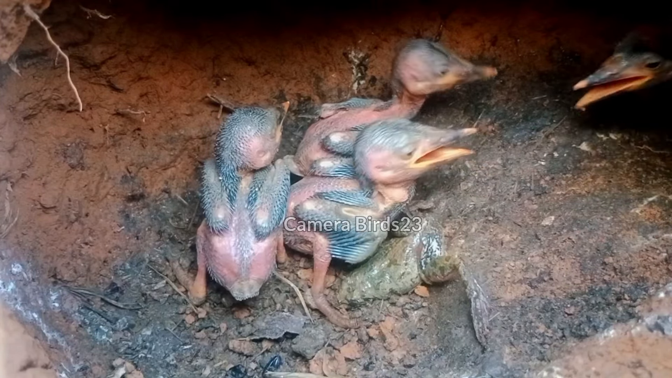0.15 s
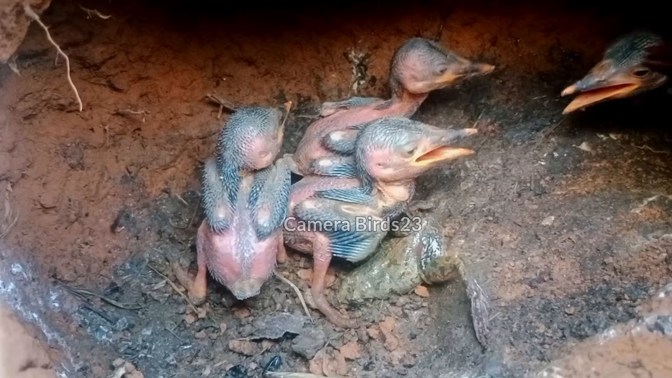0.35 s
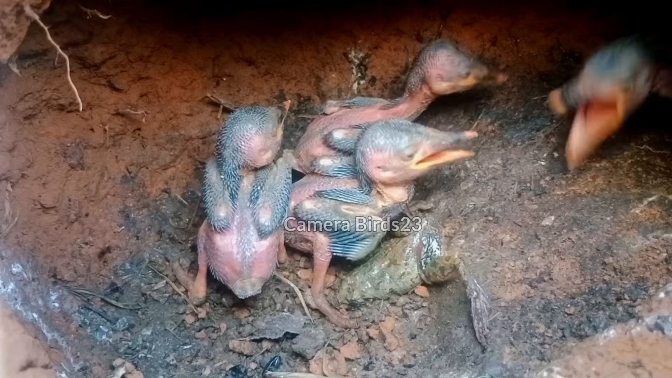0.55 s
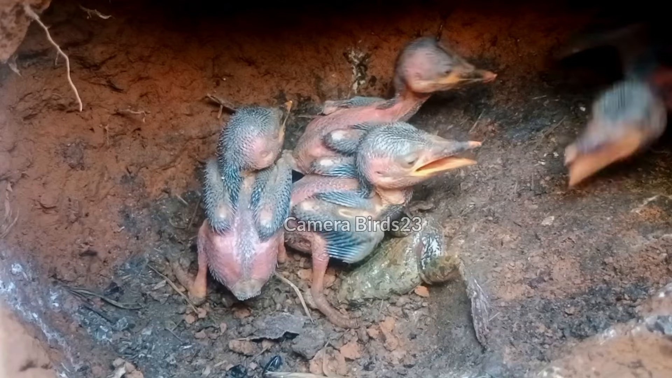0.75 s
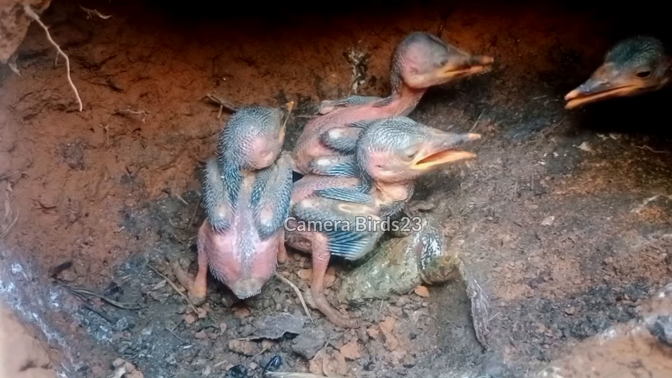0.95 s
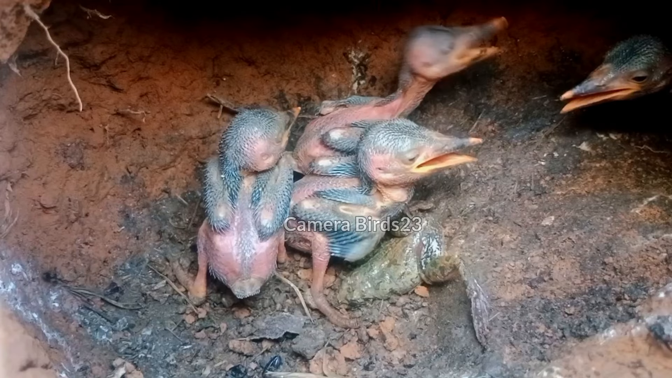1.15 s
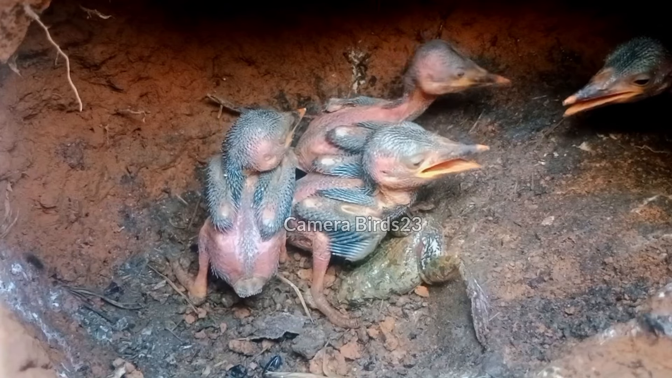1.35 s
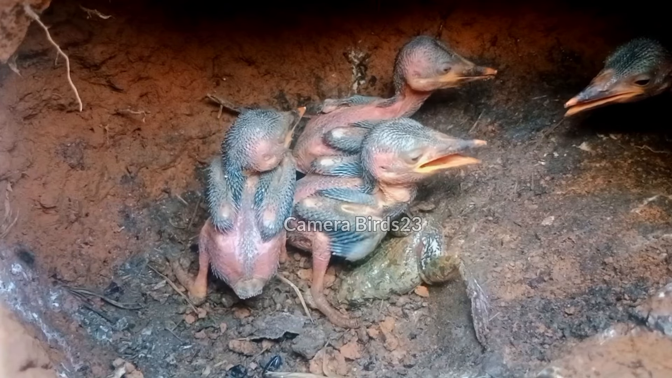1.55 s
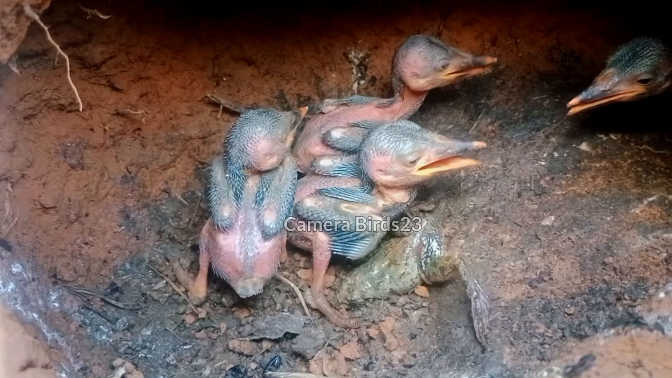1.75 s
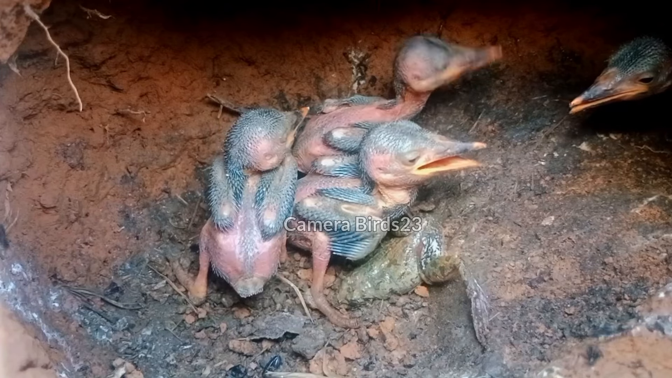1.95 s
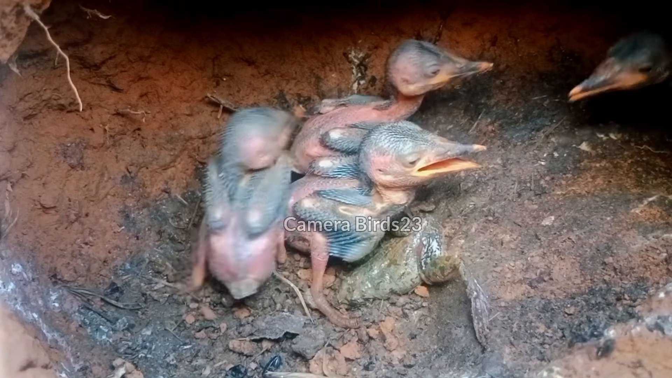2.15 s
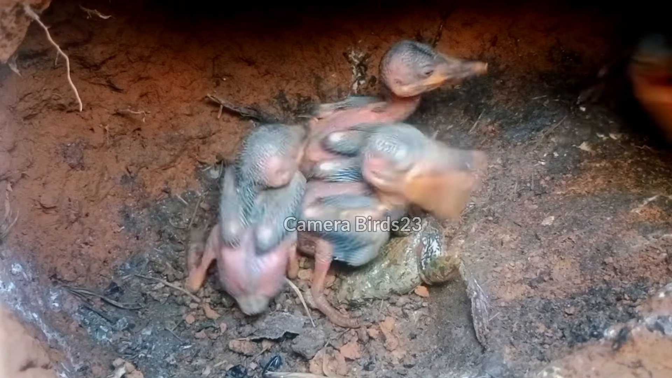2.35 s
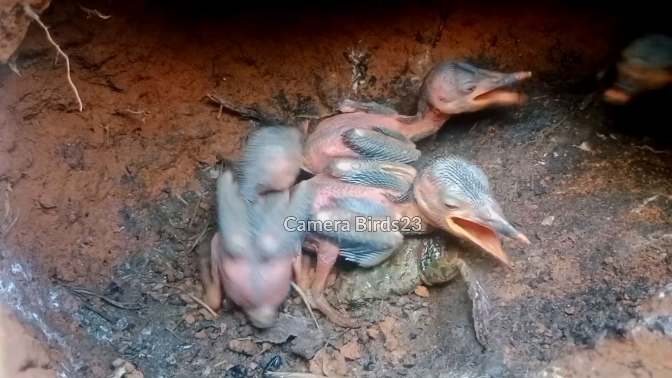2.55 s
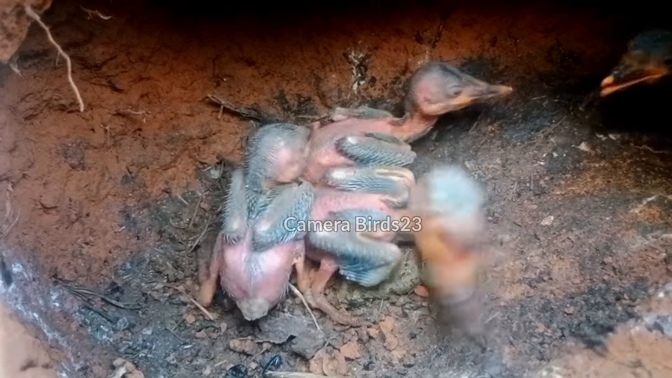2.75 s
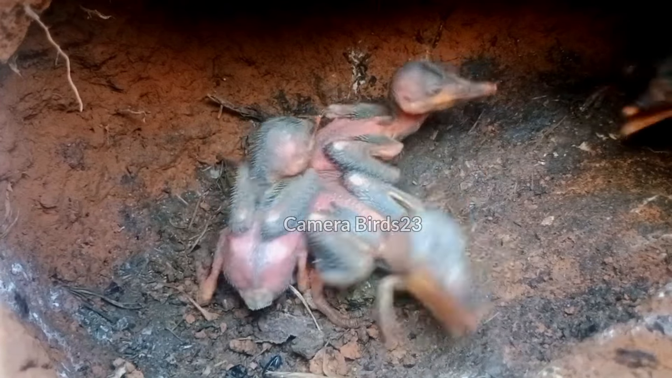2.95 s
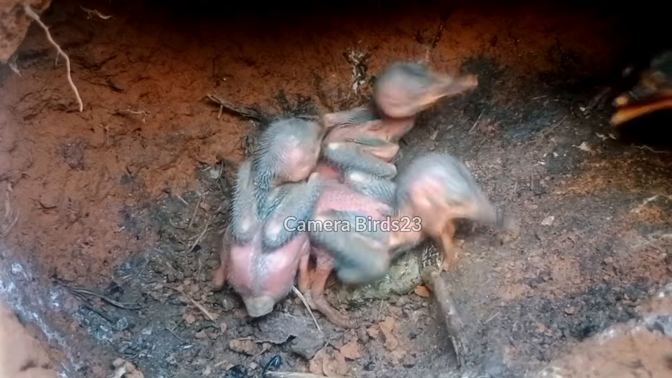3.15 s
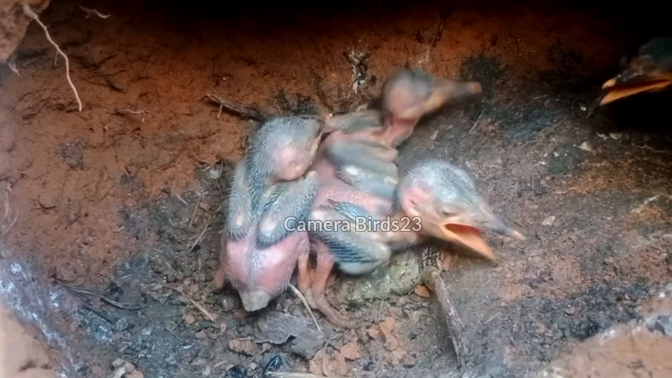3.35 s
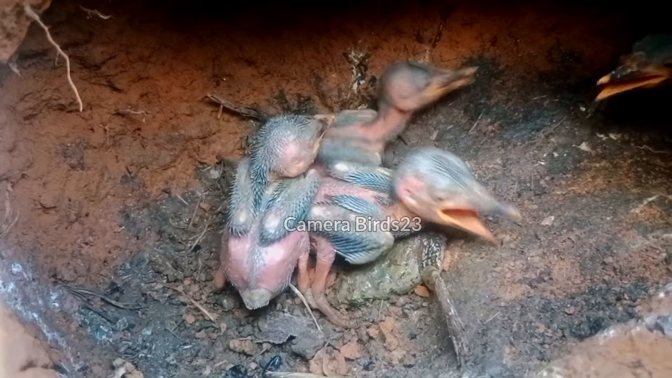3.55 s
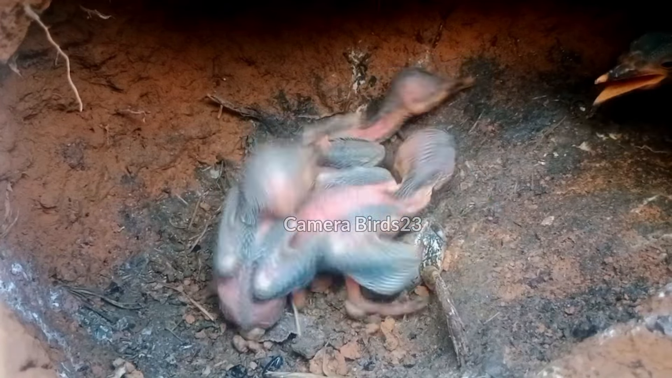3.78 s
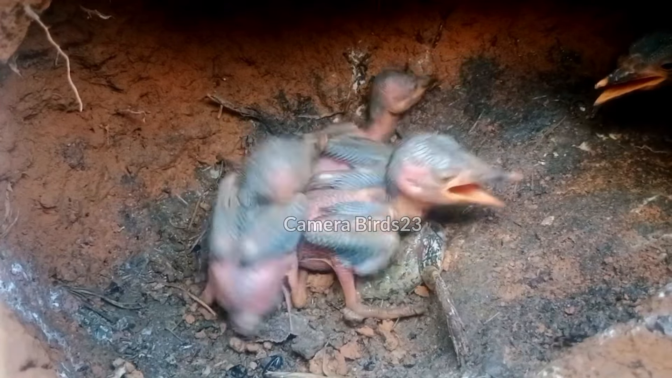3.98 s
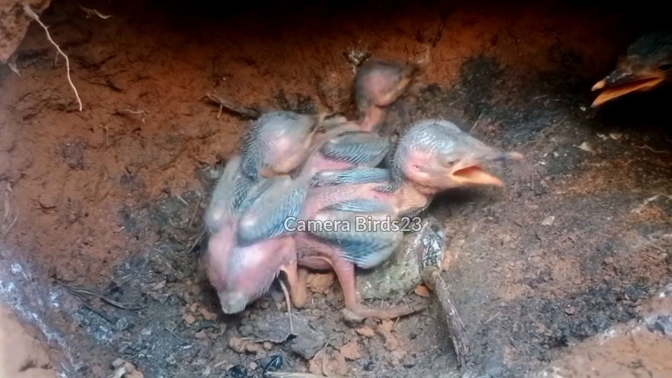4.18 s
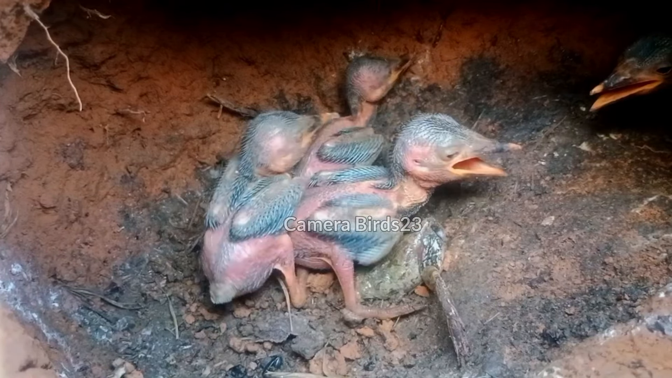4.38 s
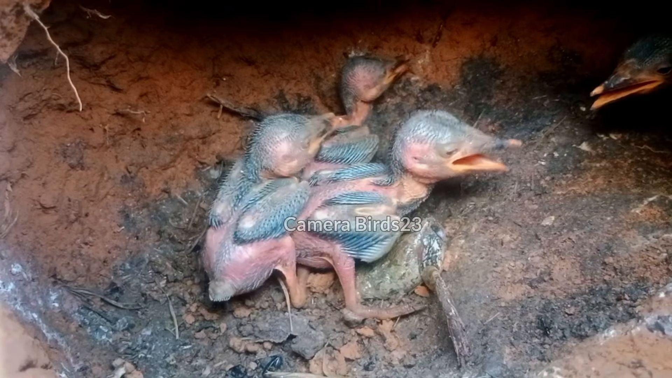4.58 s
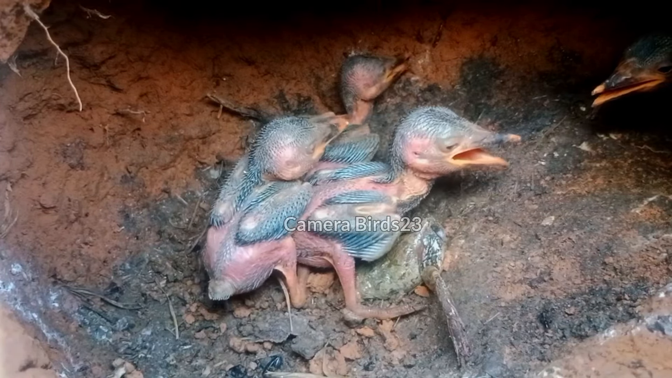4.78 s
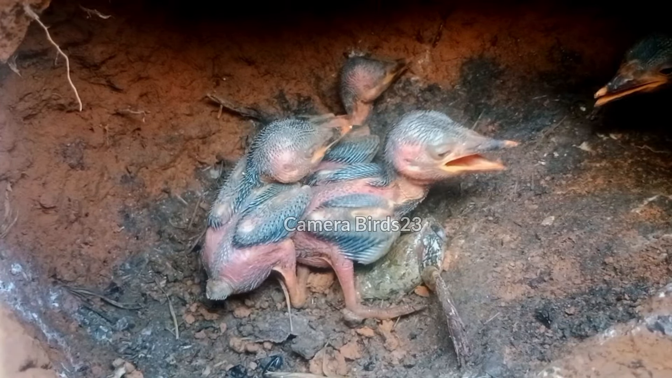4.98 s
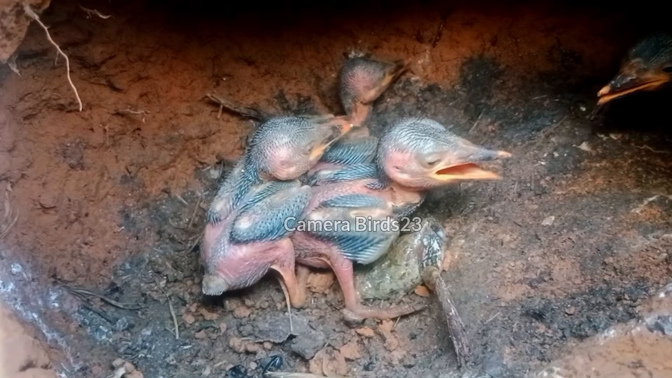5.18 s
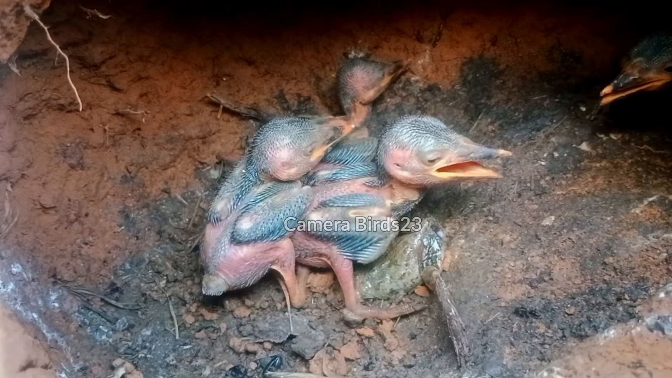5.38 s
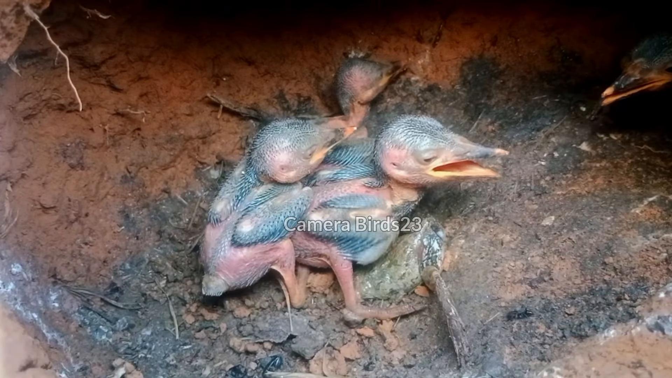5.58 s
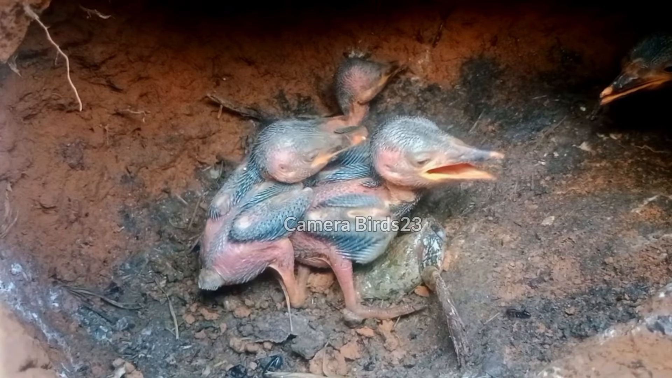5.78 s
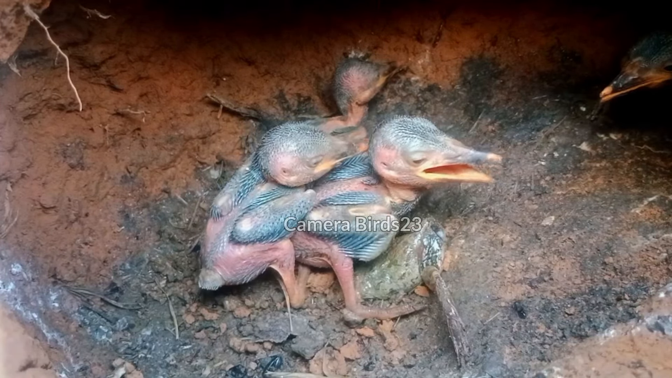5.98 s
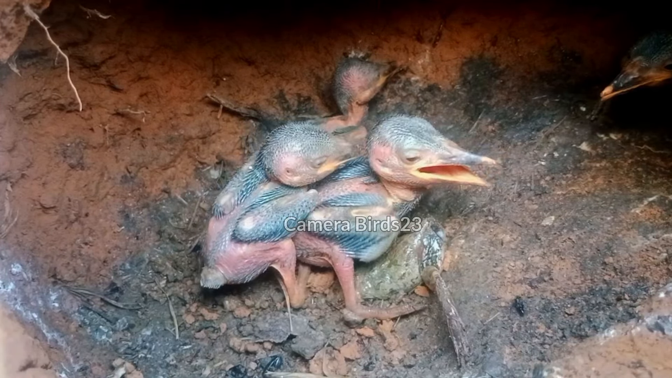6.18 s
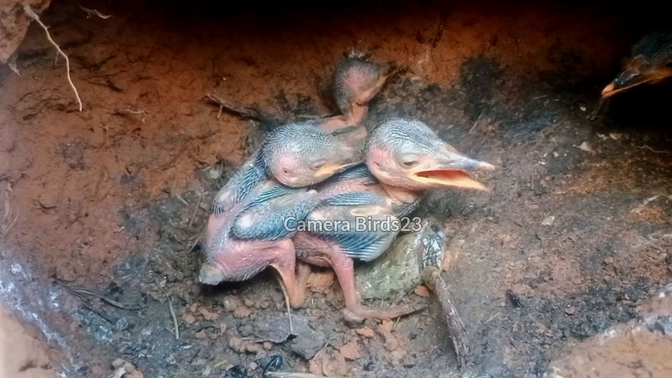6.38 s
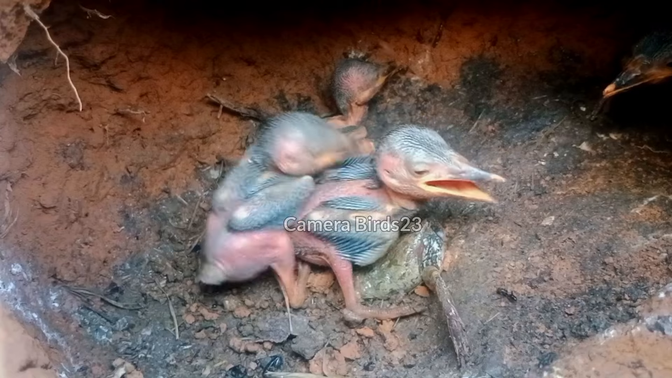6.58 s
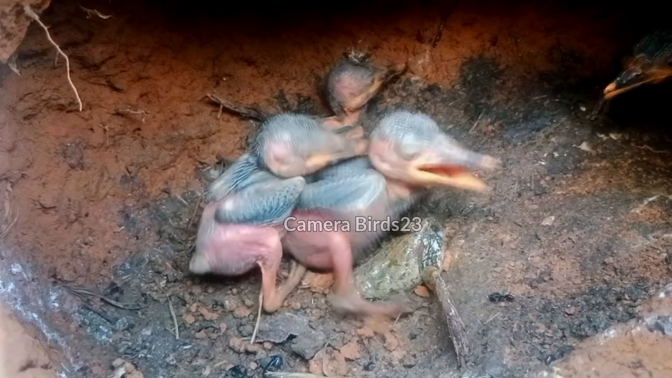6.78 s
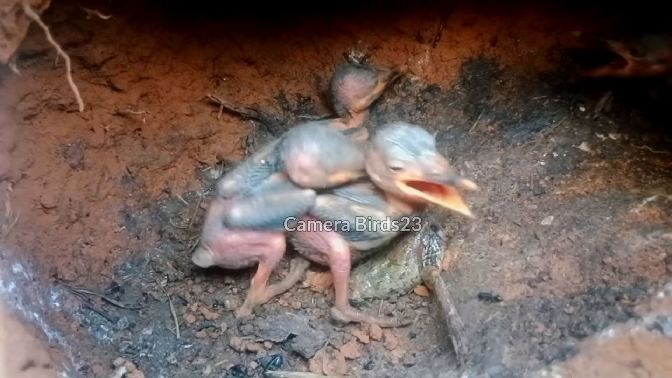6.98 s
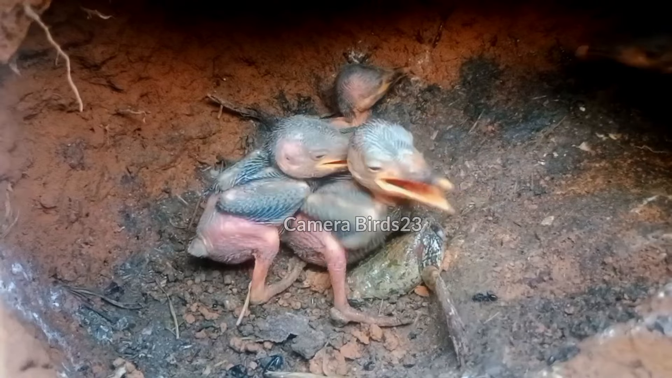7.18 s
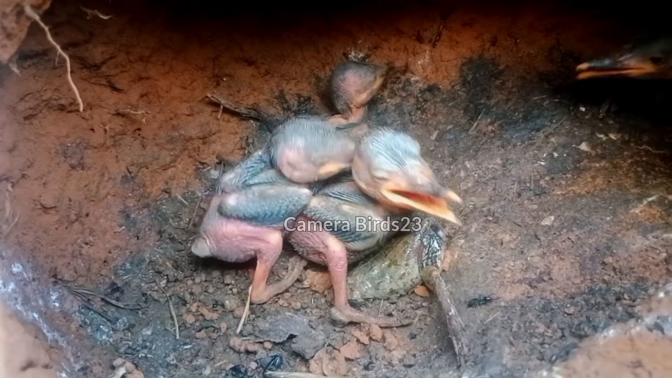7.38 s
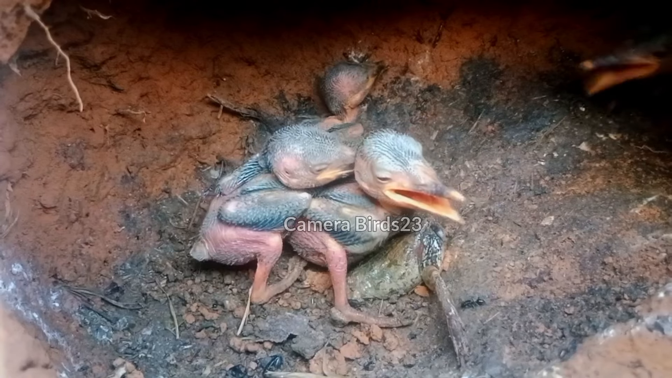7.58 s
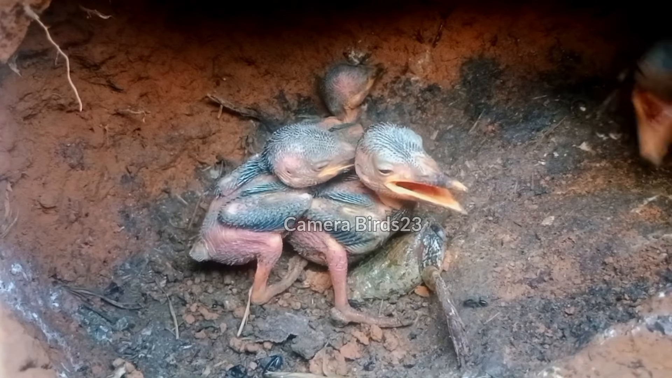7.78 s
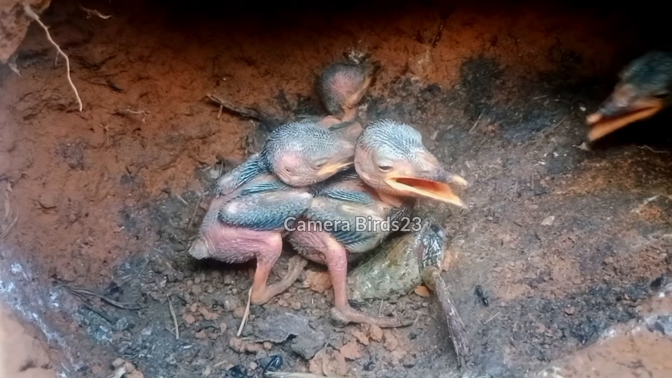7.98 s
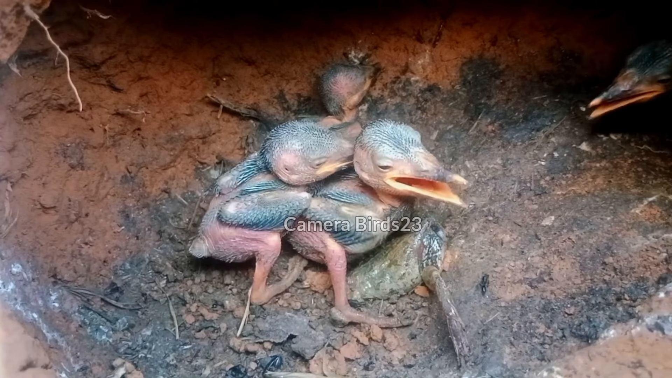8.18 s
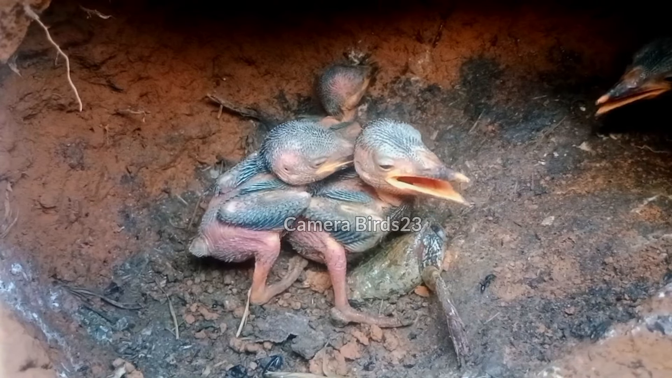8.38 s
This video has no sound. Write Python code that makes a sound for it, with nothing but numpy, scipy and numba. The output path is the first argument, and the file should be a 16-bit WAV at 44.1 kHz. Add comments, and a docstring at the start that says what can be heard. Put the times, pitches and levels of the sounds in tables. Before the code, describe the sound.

Nestlings in an earth burrow beg in fast, hoarse, rasping chirps about eight a second, swelling into one long squawk, with soft body thuds.

```python
"""Nestlings beg in an earth burrow, close to a small microphone: short hoarse calls, about eight a second,
and one long squawk. Each call is throbbing breath noise, partly whistling in the throat, partly rasping
in the air of the burrow, with breathy treble and small ticks; a thin hiss rides on top.
Bodies bump the soil now and then: low swings with a scuff of noise.
A noise gate turns down the quiet between the calls, and a faint steady self-noise lies under everything."""
import sys
import numpy as np
from scipy import signal
from scipy.fft import rfft, irfft, next_fast_len
from scipy.io import wavfile
from scipy.ndimage import uniform_filter1d
from numba import njit

SR = 44100
rng = np.random.default_rng(int(sys.argv[2]) if len(sys.argv) > 2 else 0)


def unload_wav(signal):
    """Save mono or channel-first audio to the path in sys.argv[1] as 16-bit WAV at rate SR, clipped to [-1, 1]."""
    wavfile.write(
        sys.argv[1],
        SR,
        np.round(np.clip(np.atleast_2d(signal).T, -1, 1) * 32767).astype(np.int16),
    )


N = 371763  # length of the scene in samples


def gain_of(db):
    """Turns decibels into a gain."""
    return 10 ** (np.asarray(db) / 20)


def evened(x):
    """Scales a sound to an average strength (rms) of one."""
    return x / np.sqrt(np.mean(x ** 2) + 1e-20)


def colour(x, points):
    """Filters a sound so that each pitch region gets the gain drawn by (Hz, dB) points."""
    f, db = np.transpose(points)
    size = next_fast_len(len(x))
    hz = np.fft.rfftfreq(size, 1 / SR)
    gain = gain_of(np.interp(np.log(hz + 1), np.log(f + 1), db))
    return irfft(rfft(x, size) * gain, size)[:len(x)]


@njit
def smooth(x, r):
    """Smooths by mixing each value with the last result; r, the share kept, may change over time."""
    y = x.copy()
    for i in range(1, len(x)):
        y[i] = r[i] * y[i - 1] + (1 - r[i]) * x[i]
    return y


def resonate(x, hz, width):
    """A resonance that may move: shifts pitch hz down to zero, smooths, and shifts back up."""
    turn = np.exp(2j * np.pi * np.cumsum(hz * np.ones(len(x))) / SR)
    keep = np.exp(-np.pi * width * np.ones(len(x)) / SR)
    return 2 * (turn * smooth(x / turn, keep)).real


def resonate_twice(x, hz, width, second_width):
    """Two resonances in a row at one pitch, which fall off more steeply on both sides."""
    return resonate(resonate(x, hz, width), hz, second_width)


def wander(hz):
    """Random drift of rms one, with changes up to about hz times a second."""
    slow = signal.butter(2, np.clip(hz, 1, 5000), fs=SR, output="sos")
    return evened(signal.sosfilt(slow, rng.standard_normal(N)))


def add_squawk(whistle, rasp, treble, tick, hz, rough):
    """Writes one long squawk into the curves: a drawn-out breath whose levels and pitch keep changing."""
    # The squawk point by point. Each row: time in seconds, whistle level in dB before the soil filter,
    # throat pitch in Hz, rasp level in dB before its filters, treble level in dB.
    squawk = [(2.8, -28, 3207, -41, -50.5), (2.83, -21.5, 3199, -36.5, -43), (2.87, -15.5, 3060, -35, -45),
              (2.901, -12.5, 3312, -37, -49.5), (2.94, -18.5, 3280, -31.5, -42),
              (2.98, -19, 3357, -39.5, -45), (3.03, -24.5, 3414, -32, -43.5),
              (3.08, -26.5, 3490, -33, -43.5), (3.117, -42.5, 3200, -38.5, -52)]
    s, whistle_db, throat_hz, rasp_db, treble_db = np.transpose(squawk)
    t = np.arange(s[0], s[-1], 1 / SR)
    a = round(s[0] * SR)
    span = slice(a, a + len(t))
    edges = signal.windows.tukey(len(t), .02)
    for curve, db in ((whistle, whistle_db), (rasp, rasp_db), (treble, treble_db)):
        curve[span] = edges * gain_of(np.interp(t, s, db))
    tick[a - 550:a - 250] += gain_of(-40.5) * np.hanning(300)  # a tick just before it
    hz[span], rough[span] = np.interp(t, s, throat_hz), .85


def call_curves():
    """Curves of all calls: the airway opens, holds and snaps shut, and the bill opens and closes."""
    # The short calls. Each row: start in seconds, length in seconds, whistle level in dB before the soil
    # filter, throat pitch in Hz before it bends, rasp level in dB before its filters, treble level in dB.
    calls = [(0.059, 0.074, -30, 2995, -44, -56), (0.184, 0.075, -32.5, 3017, -42.5, -55.5),
             (0.311, 0.084, -30, 2888, -42.5, -55.5), (0.446, 0.094, -33.5, 2830, -41, -56.5),
             (0.573, 0.065, -29, 2772, -43.5, -56.5), (0.738, 0.094, -32.5, 3000, -43, -56),
             (0.867, 0.071, -33, 2820, -43, -54.5), (0.994, 0.086, -31.5, 2923, -45, -56.5),
             (1.129, 0.085, -33, 2930, -41.5, -56.5), (1.263, 0.072, -34, 2950, -41.5, -57),
             (1.396, 0.06, -30.5, 3000, -39, -55), (1.521, 0.096, -32, 2998, -41, -56),
             (1.645, 0.074, -29.5, 2867, -44, -55.5), (1.779, 0.077, -31.5, 2877, -41, -56),
             (1.93, 0.097, -31.5, 2904, -39, -54), (2.033, 0.1, -27.5, 2880, -37, -53.5),
             (2.191, 0.069, -31, 2916, -44, -55), (2.329, 0.062, -25.5, 3440, -37, -44),
             (2.449, 0.083, -20.5, 3306, -35.5, -46.5), (2.544, 0.079, -13.5, 3213, -32, -45.5),
             (2.674, 0.065, -20, 3180, -35.5, -43.5), (3.17, 0.085, -31, 3433, -37.5, -50),
             (3.289, 0.065, -23.5, 3424, -38.5, -50.5), (3.402, 0.071, -23.5, 3260, -38.5, -53.5),
             (3.519, 0.074, -24.5, 3282, -36, -50), (3.644, 0.08, -26, 3403, -38.5, -48),
             (3.743, 0.12, -20.5, 3420, -34.5, -49), (3.845, 0.066, -23.5, 3350, -36.5, -48.5),
             (3.918, 0.015, -28, 2056, -58, -66), (3.939, 0.069, -22, 3403, -36.5, -47),
             (4.072, 0.076, -26.5, 3347, -36.5, -49.5), (4.189, 0.069, -26.5, 3190, -41.5, -52),
             (4.313, 0.064, -26.5, 3147, -41.5, -51.5), (4.431, 0.073, -28.5, 3063, -41, -53),
             (4.555, 0.076, -31.5, 3027, -41, -55), (4.672, 0.066, -33.5, 2980, -42.5, -57.5),
             (4.799, 0.071, -34.5, 3000, -44.5, -57), (4.926, 0.074, -31.5, 3100, -42, -56.5),
             (5.051, 0.067, -30.5, 3150, -42, -55), (5.174, 0.059, -31, 3166, -41.5, -54),
             (5.3, 0.075, -34, 3170, -43.5, -59), (5.43, 0.069, -32.5, 3078, -42.5, -55.5),
             (5.555, 0.078, -32.5, 3090, -43.5, -57), (5.679, 0.077, -31.5, 3134, -43, -55.5),
             (5.806, 0.084, -32.5, 3115, -40, -55.5), (5.938, 0.063, -33.5, 3180, -45.5, -56.5),
             (6.068, 0.082, -28, 3260, -40, -53), (6.19, 0.083, -32.5, 3194, -43, -55.5),
             (6.327, 0.076, -32.5, 3216, -41, -55.5), (6.454, 0.081, -29, 3200, -40, -53.5),
             (6.583, 0.072, -28.5, 3230, -40, -53), (6.71, 0.073, -23, 3440, -39, -49.5),
             (6.788, 0.085, -17.5, 3424, -37.5, -44.5), (6.922, 0.074, -20.5, 3430, -43.5, -50.5),
             (7.044, 0.073, -23.5, 3410, -43, -54.5), (7.167, 0.069, -22, 3406, -43, -55),
             (7.291, 0.081, -25.5, 3360, -40.5, -54), (7.422, 0.063, -29.5, 3285, -44.5, -58),
             (7.549, 0.079, -29, 3150, -38.5, -54.5), (7.679, 0.085, -30.5, 3218, -40.5, -57.5),
             (7.805, 0.071, -27.5, 3170, -40, -54.5), (7.942, 0.076, -29.5, 3140, -40, -56.5),
             (8.073, 0.074, -31, 3140, -40.5, -57), (8.195, 0.065, -30.5, 3134, -43, -57.5),
             (8.327, 0.064, -28, 3166, -41.5, -55)]
    # The whistle through a call; the bill opens, holds and shuts.
    # Each row: share of the call's length, level in dB, pitch as a ratio.
    whistle_arc = [(0, -24, .74), (0.079, -16, .93), (.2, -6, 1.01), (.42, -0.65, 1.01), (0.598, 0, .99),
                   (.78, -1, .95), (.9, -9, .84), (1, -14, .62)]
    # The rasp through a call. Each row: share of the length, level in dB.
    rasp_arc = [(0, -18), (.12, -9), (.2, -4), (.4, -0.5), (.75, -2.5), (.92, -2.5), (1, -4)]
    # The treble through a call. Each row: share of the length, level in dB.
    treble_arc = [(0, -27), (.2, -3), (.5, 0.75), (1, -8.5)]
    # How the bill resonance moves. Each row: share of the length, pitch as a ratio to the open bill.
    bill_arc = [(0, 0.44), (.18, 0.96), (.62, 0.94), (.85, .7), (1, 0.41)]
    breath_s, tire_db_per_s = .058, -330  # a call longer than one easy breath loses whistle at the end
    soft_db = -32  # whistle level of a soft call
    hoarse_soft, clearer_per_db = .8, .03  # soft calls are hoarse, loud ones clearer
    firmer_per_db = .045  # a louder call starts more abruptly and bends less in pitch
    hoarse_spread, sag_spread, closing_spread_db = .1, .03, 3.5  # chance from call to call

    whistle, rasp, treble, tick = np.zeros((4, N))
    bill = np.ones(N)  # one is open
    hz, rough = np.full(N, 2000.), np.full(N, .8)
    luck = rng.standard_normal((len(calls), 7))
    share, arc_db, ratio = np.transpose(whistle_arc)
    puff, snap = np.hanning(round(0.019 * SR)), np.hanning(30)
    for (s, long, note_db, throat_hz, rasp_db, treble_db), chances in zip(calls, luck):
        open_luck, snap_luck, depth, late, fray, sag, end = chances
        a = round(s * SR)
        u = np.arange(min(round(long * SR), N - a)) / SR / long  # share of the call gone by
        span = slice(a, a + len(u))
        left_s = (1 - u) * long
        airway = np.clip(left_s / 0.0042, 0, 1) * np.clip(u * long / 0.0041, 0, 1)  # snaps open and shut
        catch = np.exp(-((left_s - .012 - .003 * late) / .002) ** 2)
        airway *= 1 - np.clip(.55 + .4 * depth, 0, .95) * catch  # often the breath catches near the end

        ending = np.clip((u - .6) / .2, 0, 1)
        tired_db = tire_db_per_s * max(long - breath_s, 0) * ending
        louder_db = note_db - soft_db
        slack = np.clip(1 - firmer_per_db * louder_db, .35, 1)
        closing_db = closing_spread_db * end
        start_db = arc_db * np.where(share < .4, (1 + slack) / 2, 1)
        whistle[span] += airway * gain_of(note_db + tired_db) * np.interp(u, share, gain_of(start_db))
        rasp_db_now = rasp_db + np.interp(u, *np.transpose(rasp_arc)) + closing_db * ending ** 2
        rasp[span] += airway * gain_of(rasp_db_now)
        treble[span] += airway * gain_of(treble_db + np.interp(u, *np.transpose(treble_arc)))

        bend = np.interp(u, share, ratio) - 1 + sag_spread * sag * ending
        hz[span] = throat_hz * (1 + slack * bend)
        bill[span] = np.interp(u, *np.transpose(bill_arc))
        hoarse = np.clip(hoarse_soft - clearer_per_db * louder_db, .4, 1) + hoarse_spread * fray
        rough[span] = hoarse + np.interp(u, [0, .15, .6, .85], [.6, 0, 0, .6])  # frays at both ends

        b, c = a - round(0.015 * SR), a + len(u) - 30
        tick[b:b + len(puff)] += gain_of(rasp_db - 15.5 + 2.6 * open_luck) * puff  # the airway opens
        tick[c:c + 30] += gain_of(rasp_db + closing_db + 1 + 3.0 * snap_luck) * snap  # and snaps shut
    add_squawk(whistle, rasp, treble, tick, hz, rough)
    return whistle, rasp, treble, tick, hz, np.clip(rough, 0, 1), bill


def throat_note(breath, throb, turns, hz, rough):
    """The throat's whistle: a clear tone, replaced by breath noise around its pitch as it gets rougher."""
    fuzz = evened(resonate_twice(breath * throb ** 0.35, hz, 60 + 260 * rough ** 2, 680))
    return np.sqrt(2 * (1 - rough ** 2)) * np.cos(turns) + rough * fuzz


def burrow():
    """The burrow's answer to a click: its air rings at several pitches, with dark valleys between."""
    # Air resonances of the burrow. Each row: pitch in Hz, width in Hz of the first of two passes,
    # relative level in dB.
    modes = [(537, 106, -5.5), (790.4, 130, -1.5), (1416, 170, 2.5), (1903, 143, 3.5), (2530, 150, -0.5),
             (3513, 150, 0), (4076, 206, -4)]
    click = signal.unit_impulse(2048)
    rings = 0
    for k, (f, width, db) in enumerate(modes):
        rings = rings + (-1) ** k * gain_of(db) * resonate_twice(click, f, width, 2 * width)
    return rings / np.linalg.norm(rings)


def strained(rasped, rasp):
    """A stronger rasp loses much of its lows and a little of its highs, so its middle stands out."""
    usual_rasp_db, lows_per_db, highs_per_db = -44.5, -0.43, -0.14
    strength_db = 10 * np.log10(abs(uniform_filter1d(rasp ** 2, 8000)) + 1e-12)
    push_db = np.clip(strength_db - usual_rasp_db, -6, 12)
    lows = signal.sosfiltfilt(signal.butter(2, 900, "low", fs=SR, output="sos"), rasped)
    highs = signal.sosfiltfilt(signal.butter(2, 3700, "high", fs=SR, output="sos"), rasped)
    lows_change = (gain_of(lows_per_db * push_db) - 1) * lows
    return rasped + lows_change + (gain_of(highs_per_db * push_db) - 1) * highs


def burrow_rasp(breath, throb, rough, rasp, tick, bill):
    """Lumpy, throbbing breath rings the burrow's air, and a nearly shut bill adds a sliding resonance."""
    bill_db, open_bill_hz, bill_width_hz = 11, 3100, 320
    crackle = gain_of(3.44 * wander(97) * rough ** 3 - 1.5)  # rough breath breaks into lumps
    drive = breath * (throb * crackle * rasp + 0.58 * tick)
    rasped = gain_of(4.5) * signal.oaconvolve(drive, burrow())[:N]
    sweep = evened(resonate_twice(breath * throb, bill * open_bill_hz, bill_width_hz, 2 * bill_width_hz))
    # the resonance slides up at the opening, down at the closing, and grows as the bill shuts
    rasped += gain_of(bill_db) * np.clip(1 - bill, 0, 1) * rasp * sweep
    return strained(rasped, rasp)


def mouth_treble(air, turns, hz):
    """Breath hiss above the whistle, shaped by resonances of the upper mouth, plus whistle overtones."""
    # Tone of the treble. Each row: frequency in Hz, relative gain in dB.
    treble_shape = [(4700, -8), (5500, -0.5), (6000, -5), (6500, -3.5), (8600, 1), (9400, -17.5),
                    (10300, -18), (11500, -16), (13000, -20.5), (14000, -30), (15500, -24.5)]
    gape = 1 + 0.09 * wander(5)  # the bill moves and shifts the upper mouth resonances
    overtones = 0
    for k, db in ((2, 12.0), (3, -27.0)):
        overtones = overtones + gain_of(db) * evened(resonate(air + 0.77 * np.cos(k * turns), k * hz, 500))
    mouth = sum(evened(resonate(air, f * gape * hz / 3200, 290)) for f in (5700, 8300))
    hiss = evened(resonate(resonate(air, 2.37 * hz, 1100), 1.87 * hz, 1700))
    return evened(colour(1.3 * hiss + 0.32 * overtones + 0.78 * mouth, treble_shape))


def sizzle():
    """Thin noise high up: its level drifts slowly, and it flickers quickly as well."""
    # Slow drift of this hiss. Each row: time in seconds, level in dB before flicker and call loudness.
    drift = [(0, -72), (.6, -72), (1.3, -66.5), (2.1, -64), (2.9, -61), (3.2, -74), (4.4, -83), (5.2, -70),
             (6, -65), (6.8, -63.5), (7.4, -72), (8.43, -70)]
    # Its tone. Each row: frequency in Hz, relative gain in dB.
    shape = [(9000, -52), (12000, -21), (13700, -11.5), (14900, -0.8), (15800, 2.5)]
    s, db = np.transpose(drift)
    hiss = evened(colour(rng.standard_normal(N), shape)) * gain_of(3.0 * wander(60))
    return hiss * gain_of(np.interp(np.arange(N) / SR, s, db))


def nestlings():
    """A fluttering airway chops the breath into uneven throbs that drive throat and burrow."""
    # What the chamber passes on. Each row: frequency in Hz, gain in dB.
    soil = [(250, -18), (450, -3), (880, -4), (990, -11), (1150, -1), (1650, -3.5), (1900, -0.5),
            (2250, -3.5), (2700, -2), (3800, 1.5), (4150, 9), (4700, -17.5), (9000, -47)]
    sizzle_full_db = -31  # whistle level at which the thin hiss is fully there
    whistle, rasp, treble, tick, hz, rough, bill = call_curves()
    throb = evened(gain_of(3.56 * resonate(rng.standard_normal(N), 170, 200) / 0.23))
    breath = rng.standard_normal((3, N))
    turns = 2 * np.pi * np.cumsum(hz * (1 + .025 * wander(87.17))) / SR  # the pitch trembles

    note = throat_note(breath[0], throb, turns, hz, rough)
    low = burrow_rasp(breath[1], throb, rough, rasp, tick, bill)
    low += gain_of(5.5) * resonate(breath[0] * tick, 1700, 600)  # ticks sound through a nearly shut bill
    body = colour(note * whistle + low, soil + [(16000, -59.5)])

    air = breath[2] * throb ** 0.99
    high = mouth_treble(air, turns, hz) * (treble + 0.09 * tick)
    # distortion of the note: a faint, breathy tone at three times its pitch
    third = evened(resonate_twice(0.74 * np.cos(3 * turns) + air, 3 * hz, 900, 1600))
    top = sizzle() * np.clip(whistle / gain_of(sizzle_full_db), 0, 1)
    return top + gain_of(-48) * whistle * third + body + high


def tunnel(x):
    """The entrance tunnel returns a faint, short, diffuse tail: noise that dies away quickly."""
    t = np.arange(3000) / SR
    tail = rng.standard_normal(len(t)) * gain_of(-60 * t / 0.067)
    return x + gain_of(-14.0) * signal.oaconvolve(x, tail / np.linalg.norm(tail))[:N]


def bumps():
    """Bodies and feet bump the soil: each soft thud is a fading low swing with scuffed soil on top."""
    # The bumps. Each row: start in seconds, level in dB before a shared boost, pitch in Hz,
    # time to fade by 60 dB in seconds (held between 0.02 and 0.1 below).
    thuds = [(0.308, -53.5, 157.5, 0.082), (2.07, -37, 178, 0.048), (2.138, -34.5, 188.1, 0.043),
             (2.866, -48.5, 136.1, 0.064), (3.18, -56, 141, 0.097), (3.234, -58.5, 174, 0.1),
             (3.343, -32.5, 180, 0.039), (3.617, -51, 172.3, 0.13), (3.732, -45.5, 172, 0.091),
             (4.048, -55.5, 165.7, 0.13), (4.465, -54, 172.5, 0.086), (5.037, -54.5, 167, 0.069),
             (7.305, -52.5, 247, 0.073), (7.619, -48.5, 209.2, 0.066), (7.772, -46, 163.7, 0.095),
             (7.944, -62.5, 183, 0.084), (8.002, -44.5, 167.4, 0.045)]
    out, t = np.zeros(N + SR), np.arange(SR // 4) / SR
    grit = rng.standard_normal((len(thuds), len(t)))
    for (s, db, hz, fade_s), noise in zip(thuds, grit):
        rise = 1 - np.exp(-(t / 0.0068) ** 3)
        shape = rise * gain_of(db + 11.5 - 60 * t / np.clip(fade_s, .02, .1))
        scuff = evened(resonate_twice(noise, hz, 140, 240))
        a = round(s * SR)
        out[a:a + len(t)] += shape * (.7 * np.sin(2 * np.pi * hz * t) + .45 * scuff)
    return colour(out[:N], [(20, -22.5), (80, 3), (400, 1.0)])  # the microphone passes little deep bass


def scene():
    """Calls with their tunnel tail, and bumps, add up at one microphone."""
    return (tunnel(nestlings()) + bumps())[None]


def record(dry):
    """A gate turns down whatever is quieter than a call; then come self-noise and a limit to the highs."""
    # Tone of the self-noise. Each row: frequency in Hz, relative gain in dB.
    hush = [(20, -14), (60, -12), (150, -7), (300, -9), (1000, -15), (5000, -24), (16000, -32)]
    hush_db, edge_hz = -89.5, 15800  # self-noise level before the limit; where the highs are cut
    offset = -6e-5  # small constant offset of the converter
    power_db = 10 * np.log10(abs(uniform_filter1d(dry[0] ** 2, 130)) + 1e-14)
    under_db = np.clip(1.1 * (-46 - power_db), 0, 32)  # how far to turn down
    gated = dry * gain_of(-uniform_filter1d(under_db, 90))
    noisy = offset + gated + gain_of(hush_db) * evened(colour(rng.standard_normal(N), hush))
    cut = signal.firwin(511, edge_hz, window=("kaiser", 9), fs=SR)
    return signal.oaconvolve(noisy, cut[None], "same")


dry = scene()
out = record(dry)
unload_wav(out)
```